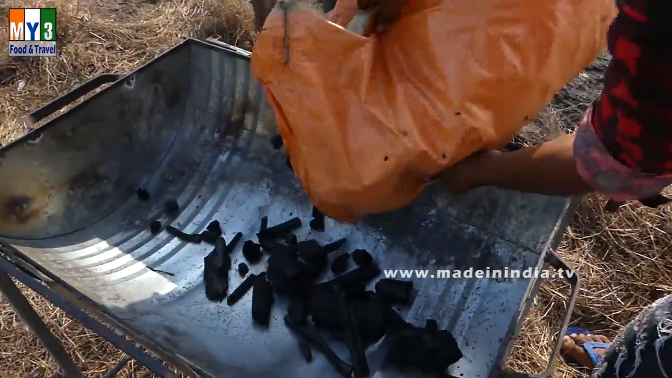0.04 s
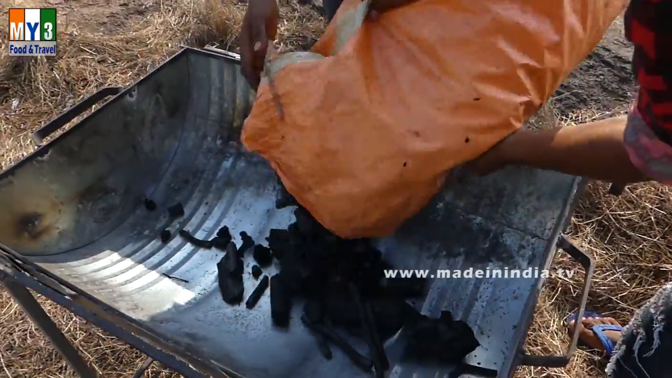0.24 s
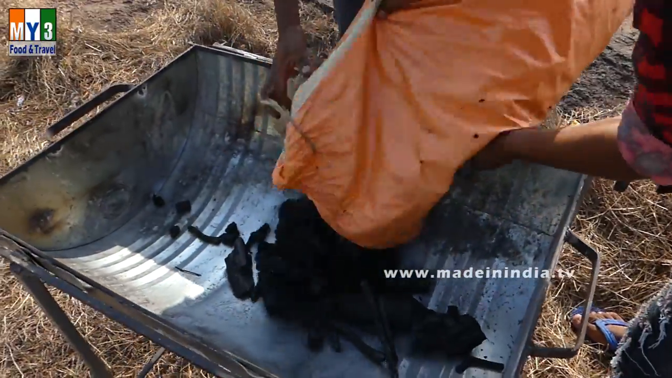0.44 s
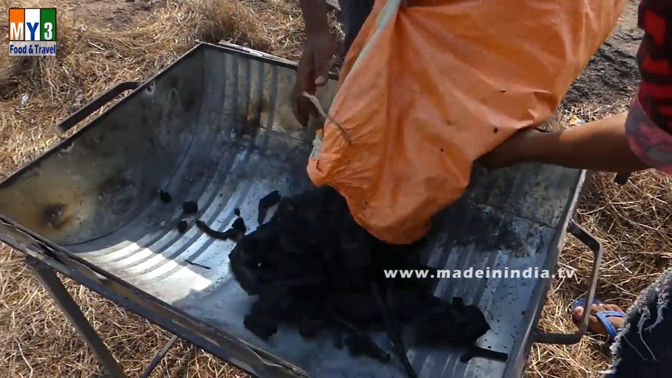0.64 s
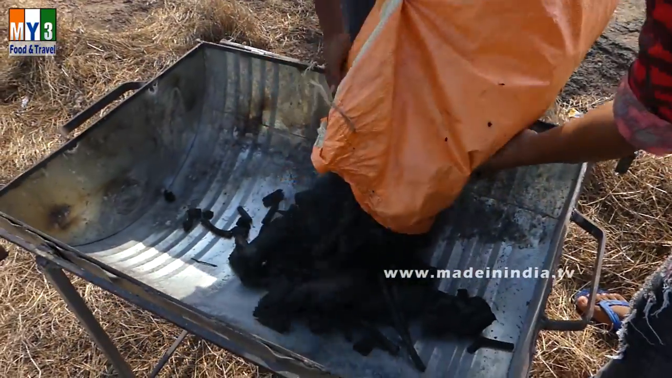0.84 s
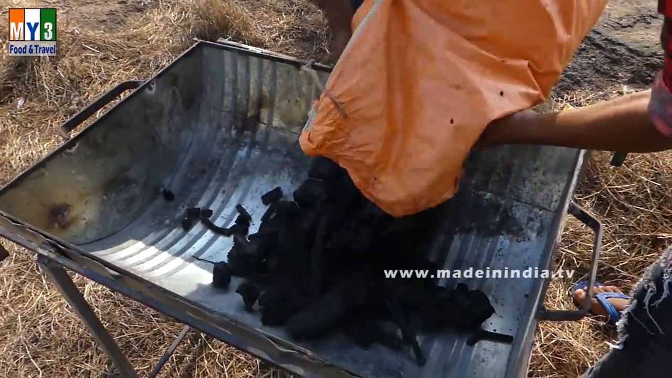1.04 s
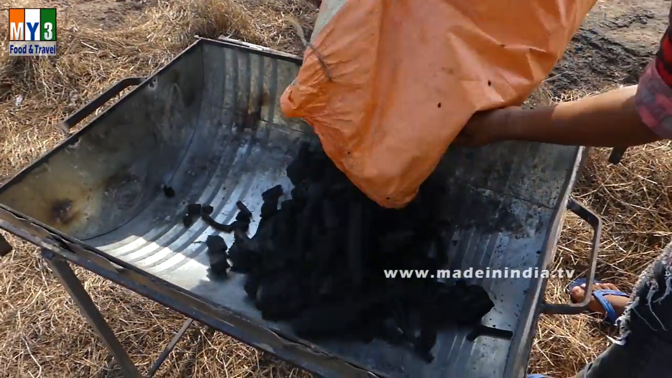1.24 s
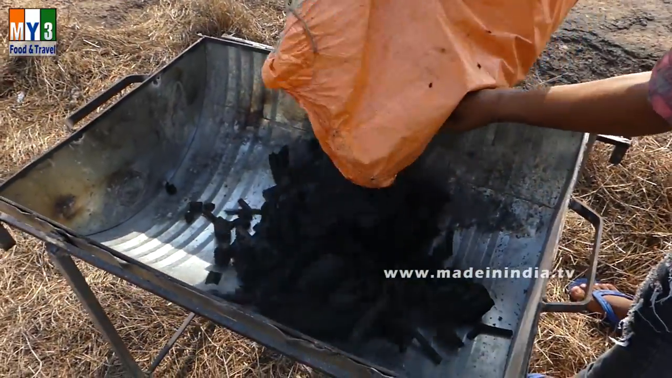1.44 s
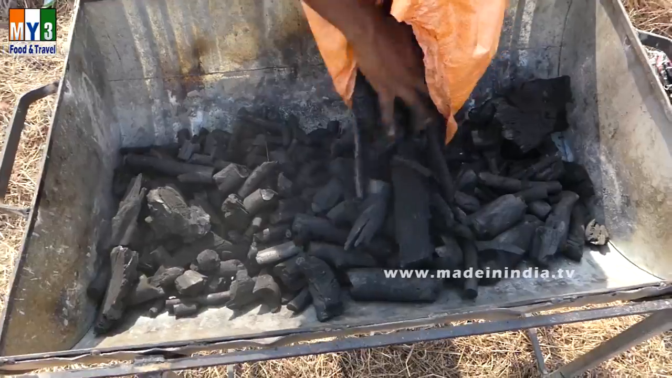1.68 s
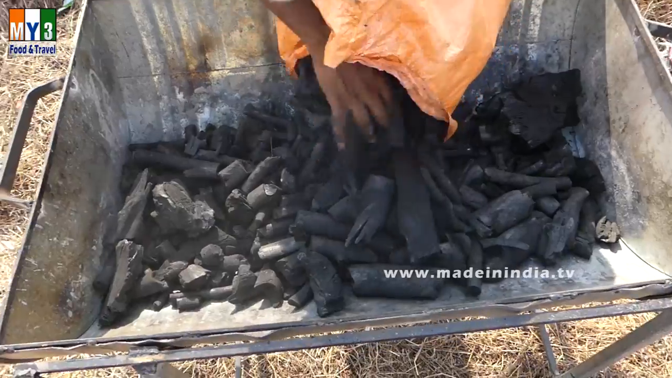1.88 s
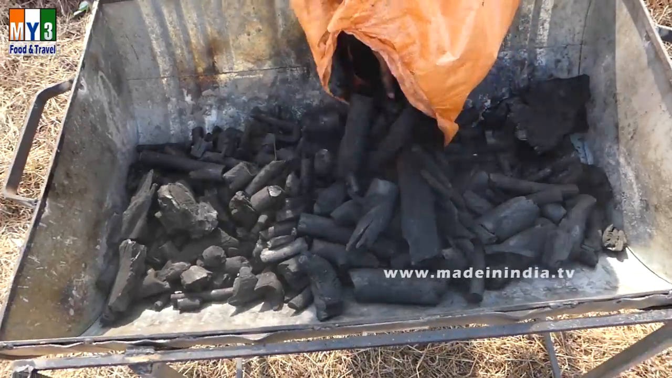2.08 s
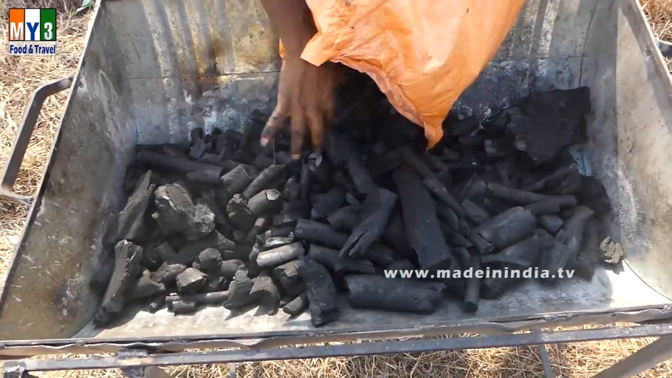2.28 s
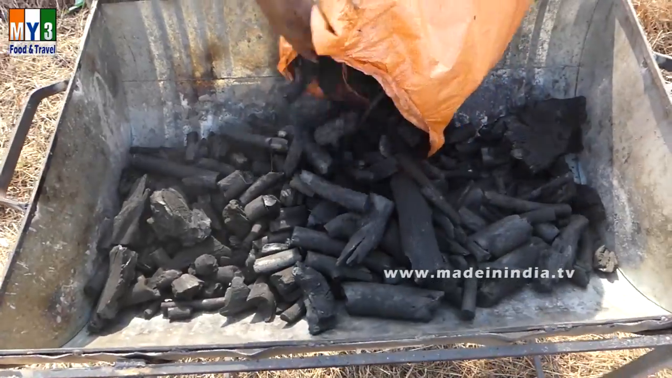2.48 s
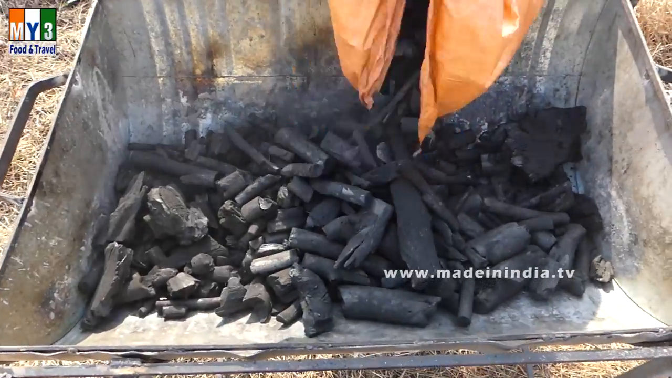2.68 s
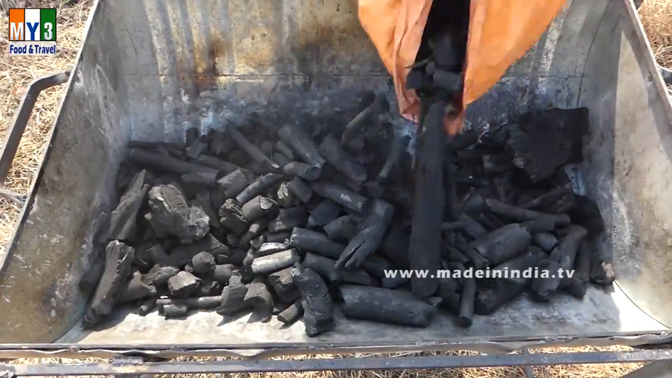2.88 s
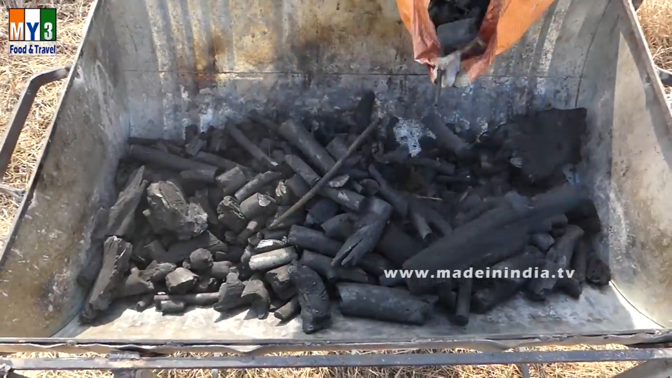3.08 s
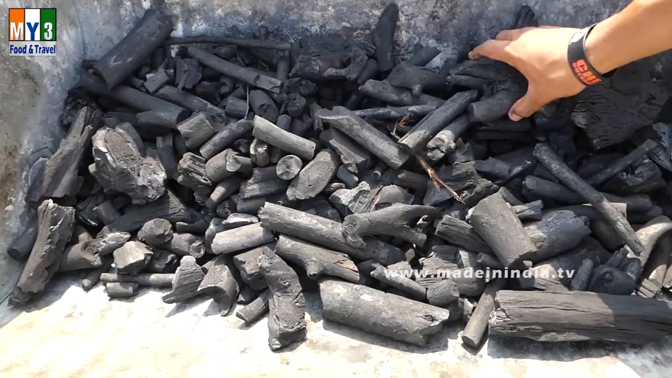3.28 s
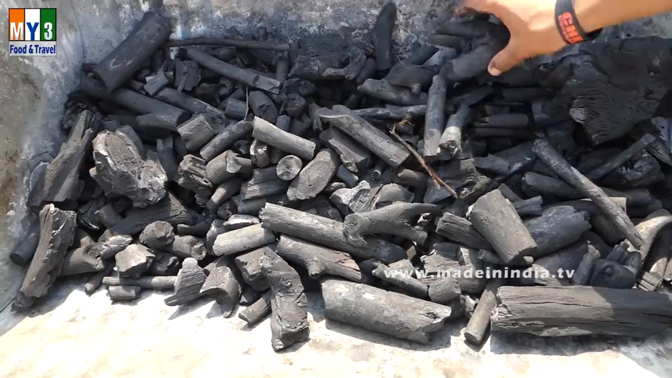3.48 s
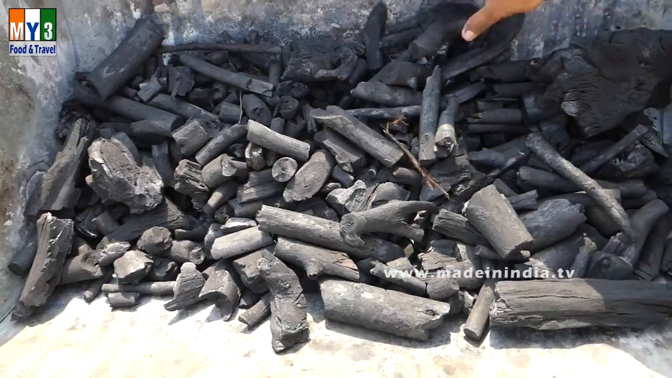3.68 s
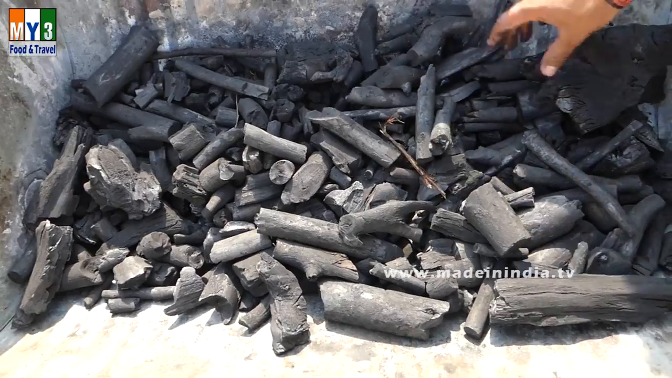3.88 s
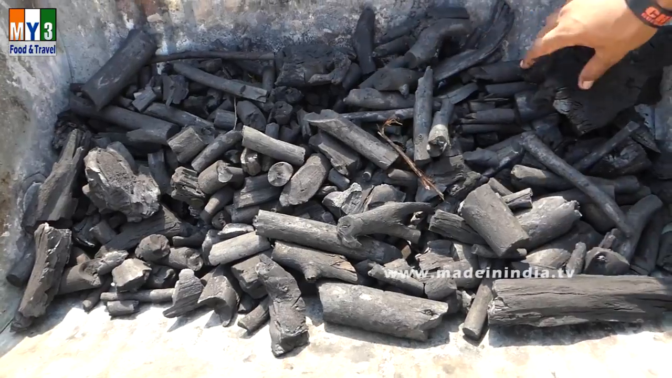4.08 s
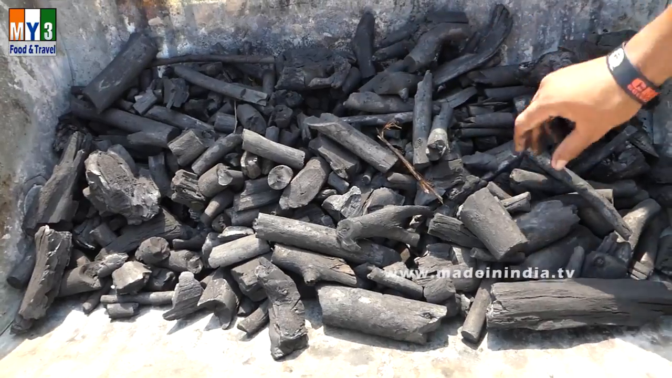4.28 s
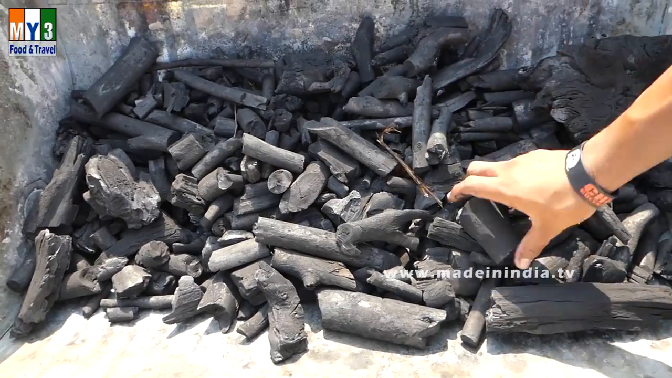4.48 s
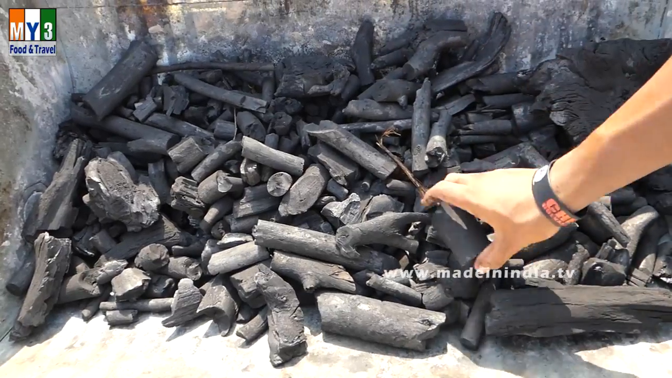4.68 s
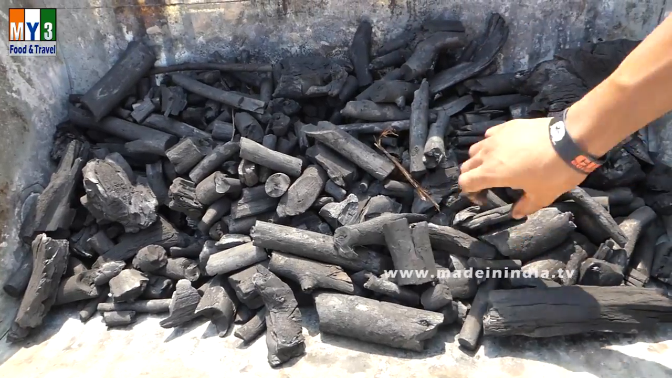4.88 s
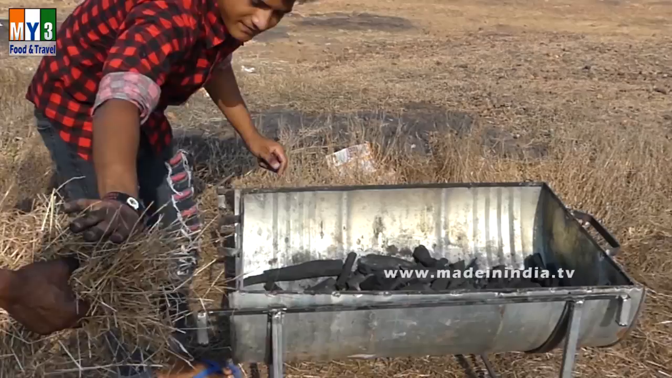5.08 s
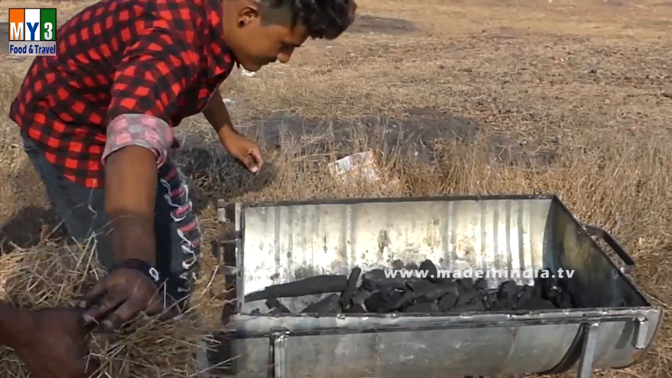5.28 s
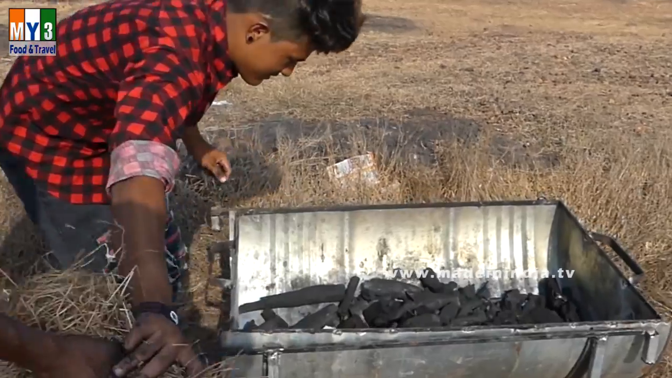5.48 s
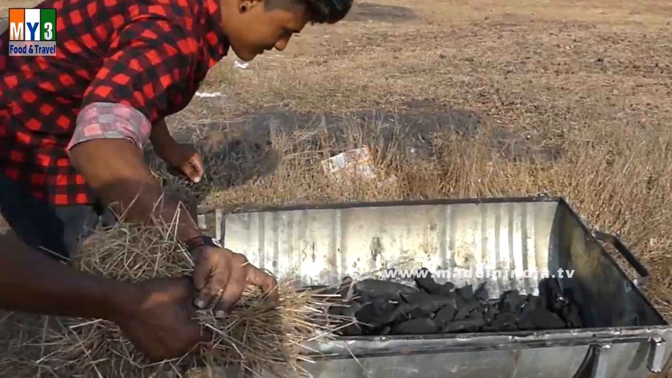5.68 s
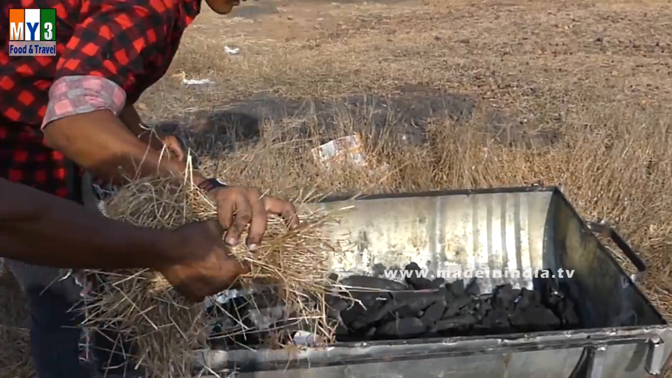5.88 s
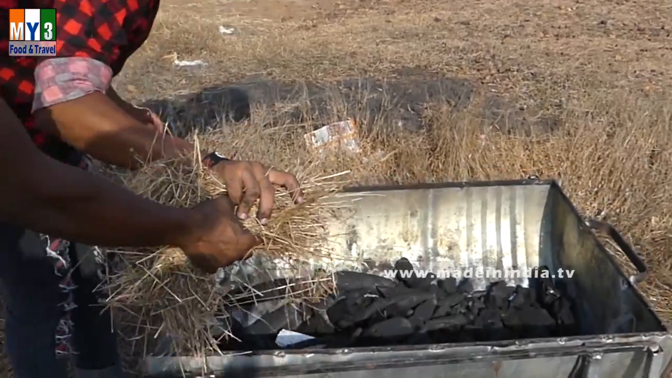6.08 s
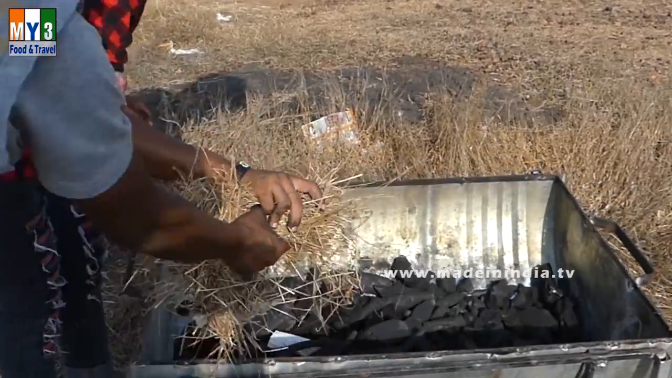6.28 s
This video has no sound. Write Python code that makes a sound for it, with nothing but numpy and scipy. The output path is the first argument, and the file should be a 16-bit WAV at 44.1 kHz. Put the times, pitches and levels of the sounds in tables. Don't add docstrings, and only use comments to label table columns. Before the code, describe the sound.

Close stereo outdoor sound. Hard, light charcoal lumps tumble quickly onto resonant metal, clacking and thudding with gritty fizz. After a cut, fewer lumps drop onto other charcoal, drier and brighter, while low wind thuds intrude. A quiet stretch follows with small scrapes, ticks, one strong hollow knock and a later smaller clack. The last second is mostly blustery wind distortion, with barely audible dry straw.

```python
import sys
import numpy as np
from scipy import signal
from scipy.fft import rfft, irfft, next_fast_len
from scipy.io import wavfile
from scipy.ndimage import uniform_filter1d

SR = 44100
rng = np.random.default_rng(int(sys.argv[2]) if len(sys.argv) > 2 else 0)


def log_audio(samples):
    frames = np.atleast_2d(samples).T
    limited = np.clip(frames, -1, 1)
    pcm = np.round(limited * 32767).astype(np.int16)
    wavfile.write(sys.argv[1], SR, pcm)


def boost(x):
    u = np.asarray(x, float) / 20
    return 10 ** u


N = 279153
T = np.arange(N) / SR
LAST_CUT_S = 5.147
FIELD_DB = -67
GUST_RISE_DB_PER_S = 419.5
SHELTERED_EDGE_DB, OPEN_EDGE_DB = -21.5, 7.5

# f/Hz, density/dB
FIELD_SPECTRUM = [(24, -47.5), (40, -2), (87, -12), (229, 8.5), (273, 14.5), (484, -9), (1250, -34.5),
                  (4800, -50), (9890, -49), (15500, -52)]
# f/Hz, density/dB
WIND_SHARED = [(24, -46), (40, -15), (156, 5), (306, 2), (662, -7.5), (1580, -27.5), (1850, -31.5),
               (2300, -45), (4500, -63.5), (5850, -100), (9900, -120)]
# f/Hz, density/dB
WIND_OPPOSED = [(24, -63.5), (40, -27.5), (123, 6), (319, 9.5), (649, 4.5), (745, 5), (1810, -19),
                (2340, -33.5), (4500, -59.5), (5850, -102), (9900, -120)]
# peak t/s, hold/s, strength/dB, fall/(dB/s), left-right/dB
GUST_EVENTS = [(2.46, .07, -30, 101.5, -1.5), (2.662, 0.0016, -29.5, 109.5, -0.5),
               (2.818, 0, -36.5, 115, -4), (3.018, 0.011, -36.5, 802, 0), (5.149, 0, -36, 125.5, -5.5),
               (5.201, 0.14, -30, 229.5, 1), (5.406, 0, -31, 172, -4), (5.481, 0, -42.5, 135, -3),
               (5.687, 0.0085, -32, 101.5, -1.5), (5.724, 0.052, -27.5, 146.5, -2.5),
               (5.936, 0.0086, -40, 474, 3), (6.171, 0, -27.5, 370.5, -1.5), (6.298, 0.1, -35.5, 300, -4)]
# t/s, peak level/dB
AIR_SLAPS = [(2.439, -19), (2.457, -14.5), (2.512, -35), (2.641, -23), (2.666, -14), (2.712, -20.5),
             (5.209, -23), (5.258, -25.5), (5.3, -25.5), (5.339, -32), (5.392, -23), (5.473, -12),
             (5.5, -27.5), (5.563, -29.5), (5.609, -38), (5.658, -25), (5.71, -29.5), (5.727, -17),
             (5.765, -19.5), (5.796, -20.5), (5.859, -46.5), (5.875, -33.5), (5.925, -23.5), (6.094, -28.5),
             (6.157, -23), (6.165, -20.5), (6.284, -26.5)]
# f/Hz, level/dB, t60/s
TRAY_MODES = [(194, 3, 0.23), (250, -5.5, 0.11), (329, -5, 0.17), (494, -25.5, 0.28), (596.6, 1.5, 0.17),
              (700, 2, 0.24), (840, -8, 0.13), (806, -9, 0.3), (1210, 2, 0.28), (1320, 5, 0.16),
              (1840, 4.5, 0.08), (2210, -14, 0.067), (2950, -6.5, 0.34), (2984, 8, 0.14)]
# f/Hz, density/dB
STREAM_SPECTRA = [
    [(24, -71.5), (40, -42), (162, -2.5), (325, -7), (496, -8.5), (704, -2.5), (2770, -4), (4030, -16.5),
     (13000, -28), (15500, -31)],
    [(24, -61), (40, -20.5), (188, 7), (548, -8.5), (722, -2.5), (998, -7), (5720, -20), (7710, -25.5),
     (10100, -21), (15500, -25.5)],
    [(24, -72), (40, -33), (101, -7), (192, 3.5), (509, -18), (591, -15), (859, -19.5), (1130, -22.5),
     (1600, -26), (15500, -33.5)],
]
# t/s, level/dB
LUMP_FLOW = [
    [(0.0, -25.5), (0.102, -32.5), (0.274, -27), (0.626, -25), (0.82, -31), (1.276, -28.5), (1.482, -26),
     (1.668, -35)],
    [(1.668, -37), (1.85, -33), (2.29, -34.5), (2.576, -42.5), (2.722, -36), (2.9, -40), (3.36, -39.5)],
    [(3.36, -40), (3.484, -47), (3.776, -42), (4.29, -48), (5.147, -48.5)],
]
# t/s, level/dB
GRIT_RUSTLE = [
    [(0.0, -29), (0.102, -36.5), (0.626, -29.5), (0.9, -36.5), (1.482, -29), (1.668, -43.5)],
    [(1.668, -31.5), (2.138, -34.5), (2.29, -30), (2.416, -40.5), (2.722, -40), (2.964, -49), (3.36, -49)],
    [(3.36, -41.5), (3.55, -43), (3.8, -45.5), (4.29, -47.5), (4.434, -54.5), (4.632, -46), (4.85, -50),
     (5.147, -49)],
]
# level/dB at -34.5 dB flow, share of flow swing/1, stream left-right/dB
TRAY_BOOM = [
    (-40, 0.65, 1.4),
    (-38.5, 0.72, 0.2),
    (-38.5, 0.87, 3),
]
# t/s, clack level/dB, clack centre f/Hz, rattle length/s
METAL_LANDINGS = [(0.064, -17.5, 2410, 0.0037), (0.134, -29, 1790, 0.024), (0.229, -27.5, 1275, .012),
                  (0.247, -24.5, 2030, 0.031), (0.411, -21, 1137, 0.0089), (0.479, -29, 2210, 0.044),
                  (0.522, -28.5, 1380, 0.025), (0.6, -27, 2510, 0.014), (0.632, -28, 2000, 0.014),
                  (0.694, -31.5, 2070, 0.018), (0.76, -30.5, 2450, 0.045), (0.905, -36.5, 1840, 0.039),
                  (0.994, -21.5, 1890, 0.007), (1.054, -29, 840, 0.016), (1.088, -31, 1870, 0.02),
                  (1.187, -26, 1280, 0.01), (1.286, -29.5, 1980, 0.028), (1.353, -32.5, 1900, 0.038),
                  (1.394, -27, 2436, 0.018), (1.442, -23, 2490, .012), (1.476, -38, 1480, 0.0079),
                  (1.498, -20, 1850, 0.0072), (1.594, -20, 1890, .012), (1.614, -23, 2560, 0.022)]
# t/s, clack level/dB, clack centre f/Hz, rattle length/s
HEAP_LANDINGS = [(1.681, -33.5, 2180, 0.018), (1.78, -35.5, 2170, 0.018), (1.865, -29.5, 2280, 0.016),
                 (1.993, -31, 2280, 0.015), (2.017, -39, 1000, .013), (2.088, -27, 1730, 0.008),
                 (2.105, -27, 1600, .011), (2.167, -39.5, 1220, 0.059), (2.219, -34, 2410, 0.0088),
                 (2.263, -36, 1560, 0.058), (2.365, -25, 1730, 0.0098), (2.405, -35.5, 3520, .007),
                 (2.428, -53.5, 1840, 0.018), (2.48, -42, 2420, 0.011), (2.581, -42.5, 1450, 0.059),
                 (2.64, -39, 1950, .0077), (2.691, -36, 1775, 0.0054), (2.864, -36.5, 1610, .012),
                 (2.875, -36, 1090, 0.014), (2.945, -47.5, 770, 0.0075), (3.209, -49.5, 960, 0.033),
                 (3.31, -42.5, 840, 0.016), (3.351, -37.5, 965, 0.0048)]
# t/s, clack level/dB, clack centre f/Hz, rattle length/s
HAND_LANDINGS = [(3.517, -44, 870, 0.01), (3.565, -42.5, 1440, .015), (3.689, -43, 3300, 0.0033),
                 (3.696, -30, 1400, 0.008), (3.749, -19.5, 1060, .006), (3.861, -51.5, 2430, 0.053),
                 (3.953, -51.5, 2700, 0.018), (4.05, -40.5, 1320, 0.0049), (4.113, -69, 2650, 0.0063),
                 (4.222, -58.5, 2760, 0.0069), (4.262, -45, 1870, 0.0051), (4.287, -53, 870, 0.015),
                 (4.423, -48, 1990, 0.0094), (4.477, -49, 1120, 0.0044), (4.491, -50, 1750, 0.00297),
                 (4.734, -46, 2600, 0.0045), (4.848, -47, 2530, 0.015), (4.89, -31.5, 1880, 0.0071),
                 (4.927, -34.5, 1290, 0.007), (4.941, -48.5, 1490, 0.011), (5.013, -41.5, 1190, 0.0065),
                 (5.132, -56, 3430, 0.013)]
# thud/dB re clack at -33 dB (sounds 2 dB lower), thud share of clack swing/1, # tick/dB re clack
# at 2 kHz and -26.5 dB (sounds 7.5 dB higher), tick rise/(dB/octave), tick share of clack swing/1
LANDING_KINDS = [
    (-7, 0.21, -19.5, 1.5, 0.55),
    (-4.5, 0.63, -11.5, 12, 1),
    (-8.5, 0.85, -8.5, 14, 1),
]
# t/s, peak level/dB, f/Hz, t60/s
CHIP_EVENTS = [(1.676, -23.5, 5840, 0.035), (1.69, -22.5, 5020, 0.032), (1.732, -23.5, 626, 0.038),
               (1.839, -28.5, 6540, 0.043), (1.868, -21, 5800, 0.038), (1.89, -25.5, 4540, 0.039),
               (1.946, -30, 5860, 0.03), (1.984, -35.5, 14000, 0.015), (2.018, -16.5, 740, 0.019),
               (2.268, -27.5, 4470, 0.028), (2.277, -25, 6500, 0.018), (2.276, -28, 9850, 0.023),
               (2.324, -34, 4330, 0.039), (2.343, -25.5, 4500, 0.027), (2.366, -27, 700, 0.099),
               (2.405, -30, 3230, 0.03), (2.431, -27, 1798, 0.048), (2.536, -40, 4600, 0.041),
               (2.545, -39.5, 2625, 0.17), (2.62, -34.5, 4120, 0.046), (2.844, -30.5, 524, 0.15),
               (3.411, -42.5, 9760, 0.14), (3.689, -42, 9100, 0.017), (4.732, -37, 6050, 0.028),
               (4.851, -40, 1980, 0.052), (4.891, -26.5, 4000, 0.02)]
# t/s, peak level/dB, f/Hz, t60/s
FLOOR_THUMPS = [(0.126, -26, 183, 0.059), (0.412, -19, 155, 0.072), (0.521, -16, 277, 0.045),
                (0.791, -28, 189, 0.04), (0.884, -26, 292, 0.045), (0.997, -29.5, 211, 0.065),
                (1.051, -25, 257, 0.045), (1.095, -20, 362, 0.047), (1.279, -23, 261, 0.044),
                (1.33, -23.5, 95, 0.09), (1.473, -17.5, 362, 0.04), (1.598, -27, 332, 0.053),
                (1.666, -24, 202, 0.049), (1.857, -28.5, 280, 0.057), (2.096, -23, 446, 0.053),
                (2.175, -36, 186, 0.037), (2.365, -16.5, 189, 0.16), (3.689, -35.5, 280, 0.045),
                (3.749, -8, 272, 0.033), (3.855, -24, 196, 0.045), (4.856, -31, 220, 0.052),
                (4.891, -20.5, 275, 0.037)]
# t/s, peak level/dB, f/Hz, t60/s
LUMP_KNOCKS = [(0.064, -15.5, 2156, 0.067), (0.133, -18.5, 1287, 0.043), (0.233, -14, 1210, 0.047),
               (0.25, -12, 2670, 0.037), (0.41, -16, 1224, 0.049), (0.52, -18, 1380, 0.045),
               (0.601, -16, 2000, 0.033), (0.635, -16.5, 670, 0.027), (0.695, -15, 1780, 0.045),
               (0.76, -15.5, 2730, 0.031), (0.868, -24, 674, 0.039), (0.904, -22, 1300, 0.036),
               (0.968, -23, 1310, 0.022), (0.994, -13.5, 2450, 0.042), (1.055, -16, 730, 0.035),
               (1.159, -19.5, 1444, 0.051), (1.187, -12.5, 1360, 0.029), (1.285, -19.5, 1854, 0.046),
               (1.355, -21.5, 1940, 0.046), (1.395, -12.5, 2770, 0.026), (1.439, -15.5, 2840, 0.027),
               (1.477, -16, 1064, 0.03), (1.498, -12.5, 2760, 0.024), (1.594, -11, 2700, 0.015),
               (1.689, -23.5, 1616, 0.052), (1.733, -14.5, 606, 0.029), (1.796, -21, 2020, 0.035),
               (1.866, -22, 2680, 0.023), (1.993, -25, 2080, 0.034), (2.018, -16, 714, 0.015),
               (2.091, -16, 654, 0.028), (2.105, -11, 763, 0.022), (2.167, -22, 730, 0.044),
               (2.218, -23, 624, 0.049), (2.262, -22, 1080, 0.023), (2.323, -27, 638, 0.049),
               (2.366, -16, 1980, 0.017), (2.406, -15.5, 3220, 0.02), (2.428, -30, 1750, 0.043),
               (2.48, -29, 945, 0.034)]
# t/s, peak level/dB, f/Hz, t60/s
SPLINTER_SNAPS = [(0.0653, -18.5, 6780, 0.016), (0.2279, -25.5, 6620, 0.015), (0.26, -21, 6800, 0.017),
                  (0.4, -30, 13000, 0.013), (0.411, -18.5, 6400, 0.015), (0.4833, -24, 6560, 0.015),
                  (0.6005, -33.5, 6660, 0.013), (0.627, -25, 6590, 0.015), (0.904, -29, 6900, 0.017),
                  (0.9921, -26, 9030, 0.015), (1.2497, -21, 6920, 0.021), (1.3932, -24, 6900, 0.017),
                  (1.4336, -25, 14400, 0.015), (1.478, -20, 9480, 0.023), (1.5928, -27.5, 7940, 0.016),
                  (1.6671, -27, 6800, 0.019), (1.6811, -22, 7420, 0.015), (1.7509, -21.5, 9820, 0.017),
                  (1.788, -23, 10400, 0.013), (1.839, -30.5, 6580, 0.014), (1.8657, -17.5, 10230, 0.017),
                  (1.9395, -33, 7150, 0.015), (1.9824, -30, 14000, 0.015), (1.9994, -23, 9500, 0.017),
                  (2.0872, -20.5, 4470, 0.018), (2.116, -27, 6700, 0.015), (2.2189, -21, 11800, 0.015),
                  (2.2768, -23.5, 9810, 0.012), (2.2775, -19.5, 14700, 0.015), (2.365, -27.5, 13600, 0.015),
                  (2.4066, -18, 6920, 0.014), (2.4299, -25, 6690, 0.018), (2.4793, -25.5, 9080, 0.023),
                  (2.6189, -25, 10680, 0.017), (2.6628, -25, 9650, 0.015), (3.468, -37, 6740, 0.015),
                  (3.5074, -28, 12600, 0.013), (3.689, -27, 9250, 0.018), (3.7474, -24, 12300, 0.018),
                  (3.9634, -30, 14750, 0.014), (4.7326, -33, 10060, 0.015), (4.8499, -37, 10300, 0.014),
                  (4.8905, -16, 6470, 0.0092)]
# t/s, peak level/dB, f/Hz, t60/s
WALL_RINGS = [(0.195, -31, 690, 0.11), (0.272, -32, 700, 0.41), (0.53, -26, 691, 0.26),
              (0.998, -15.5, 416, 0.024), (3.7, -33, 1100, .03), (3.762, -36, 593, 0.35),
              (3.765, -34, 860, 0.32), (3.79, -29, 194, 0.44), (3.748, -1, 880, 0.008),
              (3.762, -22, 1150, 0.023), (4.891, -22, 11600, .012), (4.897, -19, 650, 0.017),
              (4.929, -24.5, 900, 0.028), (5.015, -25, 1303, 0.013), (5.6, -14, 13600, 0.013)]


def evened(x):
    return x / np.sqrt(np.mean(x ** 2) + 1e-20)


def add(mix, t_s, sound):
    part = mix[..., round(t_s * SR):][..., :sound.shape[-1]]
    part += sound[..., :part.shape[-1]]


def panned(db):
    return boost(np.array([db / 2, -db / 2]))


def coloured(x, points, lo_hz=0, hi_hz=SR, count=200):
    size = next_fast_len(x.shape[-1])
    z, hz = rfft(x, size), np.fft.rfftfreq(size, 1 / SR) + 1
    edges = np.geomspace(20, SR / 2, num=count)
    power = (abs(z) ** 2).reshape(-1, len(hz)).mean(0)
    summed = np.interp(edges, hz, np.cumsum(power))
    density = np.sqrt(np.diff(summed) / np.diff(edges)) + 1e-12
    own = np.interp(hz, np.sqrt(edges[1:] * edges[:-1]), density)
    f, db = np.transpose(points)
    wanted = boost(np.interp(np.log(hz), np.log(f), db))
    band = 1 / np.sqrt((1 + (lo_hz / hz) ** 6) * (1 + (hz / hi_hz) ** 6))
    return evened(irfft(z / own * wanted * band, size)[..., :x.shape[-1]])


def ring(hz, db, t60_s, seconds):
    t = np.arange(round(seconds * SR))[:, None] / SR
    decay = boost(db - 60 * t / t60_s)
    return (decay * np.sin(2 * np.pi * (hz * t + rng.random(len(hz))))).sum(1)


def grains(size, lo_hz, hi_hz, cycles, per_s, spread_db, wide_db, count=26):
    force = boost(spread_db * np.minimum(rng.exponential(1, size), 5))
    force = force * (rng.random(size) < per_s / SR)
    lump, out = rng.integers(0, count, size), np.zeros((2, size))
    for k in range(count):
        place = (k + rng.random(3) * [1, 6, -6]) / count % 1
        hz = lo_hz * (hi_hz / lo_hz) ** place
        body = ring(hz, 0, cycles / hz * rng.uniform(0.44, 1.35, 3), 0.19)
        struck = signal.oaconvolve(force * (lump == k), body)[:size]
        out += panned(wide_db * rng.standard_normal())[:, None] * struck
    return out


def trough(x, wet_db, t60_s, apart):
    t = np.arange(SR // 2) / SR
    hz, db, wall_t60_s = np.transpose(TRAY_MODES)
    both, left, right = rng.standard_normal((3, len(t))) * boost(-60 * t / t60_s) * (t > .002)
    echo = both + apart * np.array([left, right])
    dull = uniform_filter1d(echo, size=7)
    echo = evened(dull + (echo - dull) * boost(-90 * t / t60_s))
    walls = evened(ring(hz, db, wall_t60_s, .5))
    tail = (echo + boost(-13.0) * walls) / np.sqrt(len(t))
    return x + boost(wet_db) * signal.fftconvolve(x, tail, axes=1)[:, :x.shape[1]]


def field():
    a = rng.standard_normal((4, N))
    drift_db = 2.2 * evened(uniform_filter1d(a[3], 3000))
    drift = boost(drift_db + 1.5 * (T < 5.3))
    hiss = coloured(a[:2] * 1.2 + a[2], FIELD_SPECTRUM, 1500)
    rumble = coloured(a[:2] + a[2], FIELD_SPECTRUM, 0, 1200)
    return boost(FIELD_DB - 2.0) * drift * hiss + boost(-58.0) * rumble


def gusts():
    s, hold, db, fall, pan = np.transpose(GUST_EVENTS)[:, :, None]
    t = T[::64]
    rise_loss_db = GUST_RISE_DB_PER_S * np.maximum(s - t, 0)
    each_db = db - rise_loss_db - fall * np.maximum(t - s - hold, 0)
    other_side = (t < LAST_CUT_S) != (s < LAST_CUT_S)
    weight = boost(np.maximum(each_db, -110) - 140 * other_side)
    level_db, pan_db = 20 * np.log10(weight.max(0)), (weight * pan).sum(0) / weight.sum(0)
    edge_db = np.where(T < LAST_CUT_S, SHELTERED_EDGE_DB, OPEN_EDGE_DB)
    return np.interp(T, t, level_db), edge_db, np.interp(T, t, pan_db)


def wind():
    level_db, edge_db, pan_db = gusts()
    kicks = rng.standard_normal((2, N)) * (rng.random((2, N)) < 1100 / SR)
    kicks *= boost(2.46 * evened(uniform_filter1d(rng.standard_normal(N), 300)))
    kicks = boost(level_db) * evened(kicks)
    for s, db in AIR_SLAPS:
        add(kicks, s, boost(db - 3.0) * rng.standard_normal((2, 500)) * np.hanning(500))
    sharp = kicks * boost(edge_db + 0.59 * (level_db + 28.0))
    soft_gain, sharp_gain = np.std(kicks), np.std(sharp)
    mid = soft_gain * coloured(kicks[0], WIND_SHARED, 0, 418)
    mid = mid + sharp_gain * boost(-13.0) * coloured(sharp[0], WIND_SHARED, 480)
    side = soft_gain * boost(-2.5) * coloured(kicks[1], WIND_OPPOSED, 0, 620)
    side = side + sharp_gain * boost(-4.5) * coloured(sharp[1], WIND_OPPOSED, 480)
    ports = panned(pan_db) * np.array([mid + side, mid - side])
    return 0.36 * np.tanh(ports / 0.42)


def straw():
    size = N - round(LAST_CUT_S * SR)
    clumps = boost(3.9 * evened(uniform_filter1d(rng.standard_normal(size), 700)))
    crackle = grains(size, 2500, 15000, cycles=3.3, per_s=900, spread_db=1.5, wide_db=7.0, count=8)
    return boost(-80.0) * evened(clumps * crackle)


def chinks():
    s, db = np.transpose(sum(GRIT_RUSTLE, []))
    size = round(LAST_CUT_S * SR)
    rung = grains(size, 2600, 11500, cycles=230, per_s=150, spread_db=3.0, wide_db=4.5, count=9)
    return boost(np.interp(T[:size], s, db) - 11.0) * evened(rung)


def chips():
    out = np.zeros((2, N))
    for s, db, hz, t60_s in CHIP_EVENTS:
        modes_hz = hz * np.array([1, 1.52, 2.27]) % (SR / 2)
        add(out, s, ring(modes_hz, db - np.array([0, 15, 15]), max(t60_s, .005), 0.034))
    return out


def tap(db, hz, t60_s, side_db, apart):
    t = np.arange(SR // 5)[:, None] / SR
    modes_t60_s = np.clip(t60_s, .005, .4) * np.array([1, .6, .45])
    modes_hz = hz * np.array([1, 1 / apart, apart ** 1.2])
    modes = boost(side_db * np.array([0, 1, 1]) - 60 * t / modes_t60_s) * np.sin(2 * np.pi * modes_hz * t)
    rise_s = 1.3 / hz + .0015 * (hz > 6000)
    return boost(db) * modes.sum(1) * np.minimum(t[:, 0] / rise_s, 1)


def taps():
    out = np.zeros((2, N))
    kinds = ((FLOOR_THUMPS, -3, -7, 1.24), (LUMP_KNOCKS, -5, -4, 1.3),
             (SPLINTER_SNAPS, -2.5, -2.5, 1.42), (WALL_RINGS, 0, -10, 1.2))
    for rows, trim_db, side_db, apart in kinds:
        for s, db, hz, t60_s in rows:
            add(out, s, tap(db + trim_db, hz, t60_s, side_db, apart))
    return out


def hit(db, hz, thud_db, tick_db, length_s):
    luck, length_s = rng.random((4, 40)), np.clip(length_s, .002, .08)
    blows = np.zeros(SR // 5)
    at = (2.2 * luck[0] * length_s * SR).astype(int)
    blows[at] = (luck[1] - .5) * boost(-20 * luck[0] ** 1.6)
    blows[0] = 0.22
    spread = (np.arange(40) + luck[2]) / 40
    clack_hz, tick_hz = 520 * 9.97 ** spread, 4500 * 3.4 ** spread
    thud_hz = np.r_[TRAY_MODES[0][0], 210 * 2.5 ** spread[::5]]
    clack_mode_db = -8 * abs(np.log2(clack_hz / hz)) ** 0.36
    clack = ring(clack_hz, clack_mode_db, np.clip(24 / clack_hz, .008, .035), 0.088)
    thud = ring(thud_hz, np.r_[-11, np.zeros(8)], np.r_[.45, np.full(8, .07)], 0.3)
    tick = ring(tick_hz, 0, 0.0016, .02)
    hump = [(hz / 8, -26), (hz / 2, -6), (hz, 0), (hz * 2, -8), (hz * 8, -28)]
    sound, head = np.zeros(SR // 2), round(max(length_s, .008) * SR)
    for body, part_db in ((clack, 0), (thud, thud_db - 2.0), (tick, tick_db + 7.5)):
        part = signal.fftconvolve(blows, body)
        if body is clack:
            part = coloured(part, hump, 260, 4500, count=60)[:SR // 4]
        add(sound, 0, boost(db + part_db - 1.5) * part / np.std(part[:head]))
    sound = signal.lfilter(*signal.butter(2, 140, "high", fs=SR), sound)
    return panned(4 * (luck[3, 0] - .4))[:, None] * sound


def landings():
    out = np.zeros((2, N))
    for rows, kind in zip((METAL_LANDINGS, HEAP_LANDINGS, HAND_LANDINGS), LANDING_KINDS):
        thud_db, share, tick_db, tick_rise_db, tick_share = kind
        for s, db, hz, length_s in rows:
            grit_db = tick_db + tick_rise_db * np.log2(hz / 2000) + (tick_share - 1) * (db + 26.5)
            add(out, s, hit(db, hz, thud_db + (share - 1) * (db + 33), grit_db, length_s))
    return out


def pour(flow, rustle, boom_rule, colour):
    t = T[round(flow[0][0] * SR):round(flow[-1][0] * SR)]
    size = len(t)
    flow_db, rustle_db = np.interp(t, *np.transpose(flow)), np.interp(t, *np.transpose(rustle))
    base_db, share, pan_db = boom_rule
    boom_db = base_db + share * (flow_db + 34.5) - 2.0
    clink = grains(size, 496, 4450, cycles=14.5, per_s=1400, spread_db=2.5, wide_db=2.5)
    clink = trough(clink, -1.2, 0.046, 0.41)
    boom = grains(size, 78.4, 548, cycles=12.0, per_s=200, spread_db=3.5, wide_db=0.0)
    boom = trough(boom, .5, 0.27, 0.7)
    fizz = grains(size, 3500, 15000, cycles=4.2, per_s=2000, spread_db=2.0, wide_db=7.5)
    fizz = trough(fizz, 8.5, 0.024, 0.13)
    stream = boost(flow_db - 3.0) * coloured(clink, colour, 450, 4980)
    stream = stream + boost(boom_db) * coloured(boom, colour, 0, 550)
    stream = stream + boost(rustle_db - 5.0) * coloured(fizz, colour, 3800)
    return panned(pan_db)[:, None] * stream


def scene():
    mix = field() + wind()
    add(mix, LAST_CUT_S, straw())
    add(mix, 0, chinks())
    at_tray = T < LAST_CUT_S
    add(mix, 0, trough(taps(), -8.5, 0.13, 0.89) * at_tray)
    add(mix, 0, trough(chips() + landings(), -5.5, 0.33, 0.64) * at_tray)
    for flow, *rest in zip(LUMP_FLOW, GRIT_RUSTLE, TRAY_BOOM, STREAM_SPECTRA):
        add(mix, flow[0][0], pour(flow, *rest))
    return mix


def scattered(x, spread_s, above_hz):
    size = next_fast_len(N)
    hz = np.fft.rfftfreq(size, 1 / SR)
    wander = evened(uniform_filter1d(rng.standard_normal(len(hz)), size=900))
    delay_s = spread_s * wander / (1 + (above_hz / (hz + 1)) ** 6)
    turn = np.exp(-2j * np.pi * np.cumsum(delay_s) * SR / size)
    return irfft(rfft(x, size) * turn, size)[:, :N]


def band_limit(x):
    return signal.sosfilt(signal.butter(12, 15950, fs=SR, output="sos"), x)


def record(dry):
    x = scattered(dry, 0.00092, 6800)
    x = signal.lfilter(*signal.iirnotch(7560, 60, SR), x)
    x = signal.lfilter(*signal.butter(1, 45, "high", fs=SR), x)
    lowpass = signal.firwin(301, 15800, window=("kaiser", 8), fs=SR)
    x = signal.oaconvolve(x, lowpass[None], "same")
    return band_limit(x)


dry = scene()
out = record(dry)
log_audio(out)
```